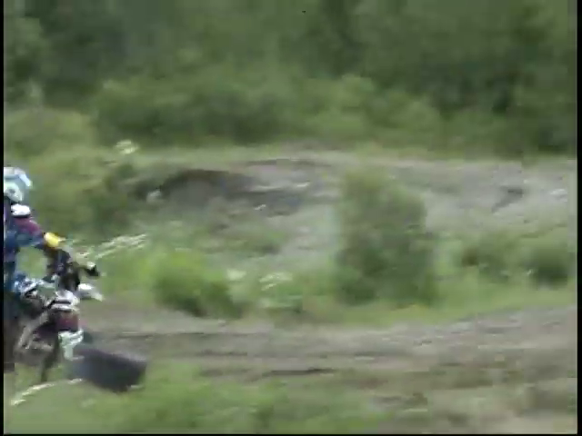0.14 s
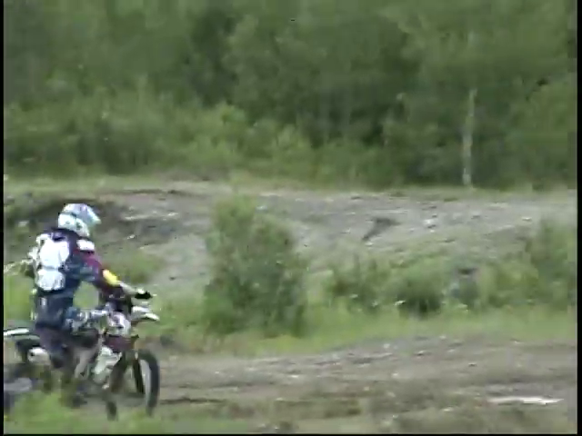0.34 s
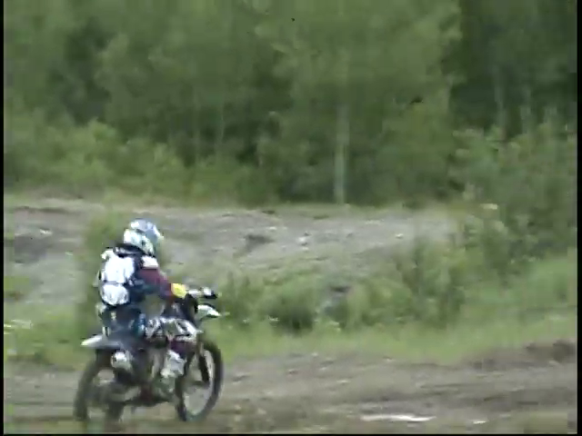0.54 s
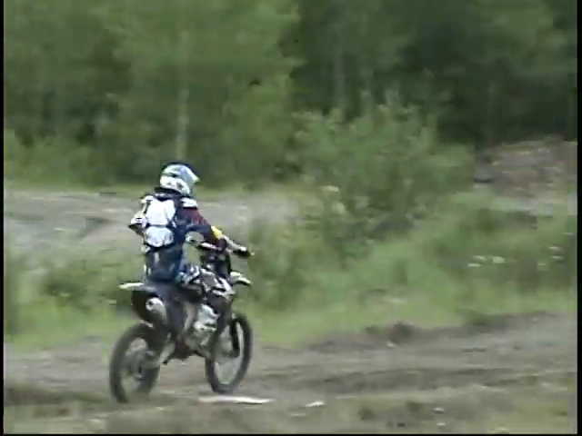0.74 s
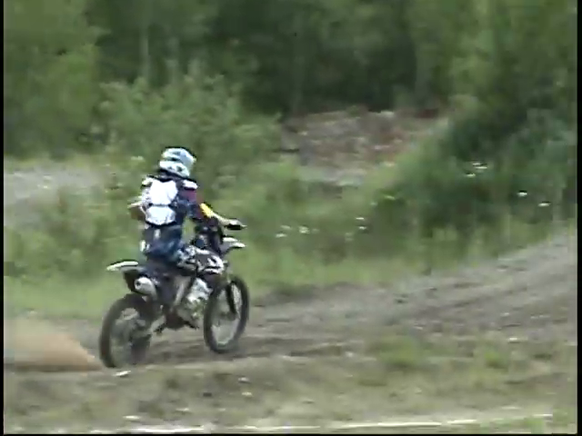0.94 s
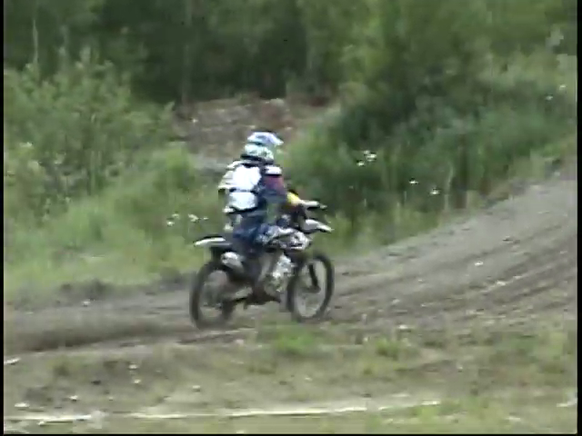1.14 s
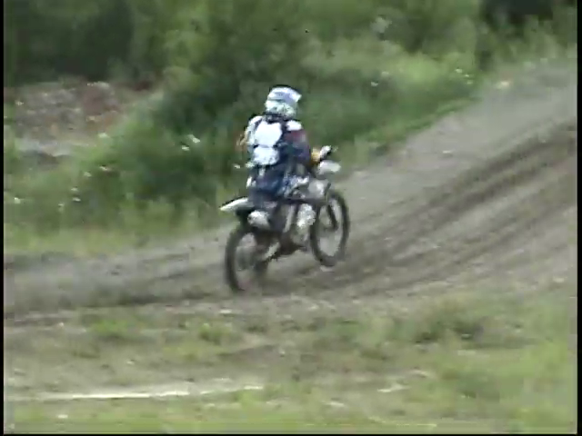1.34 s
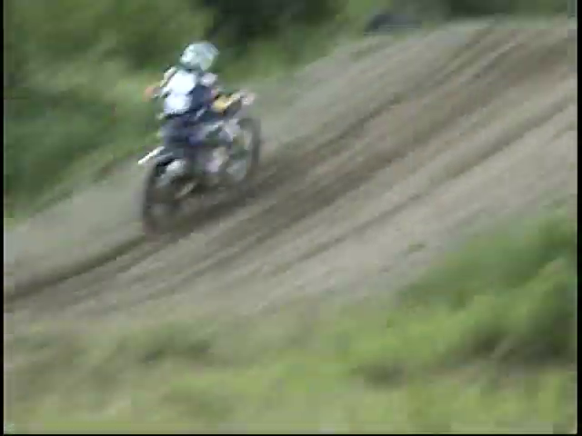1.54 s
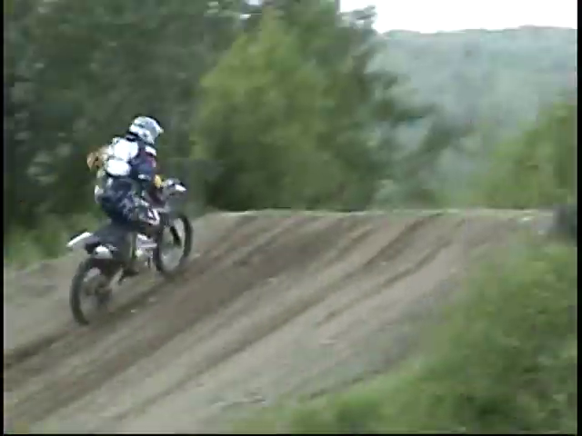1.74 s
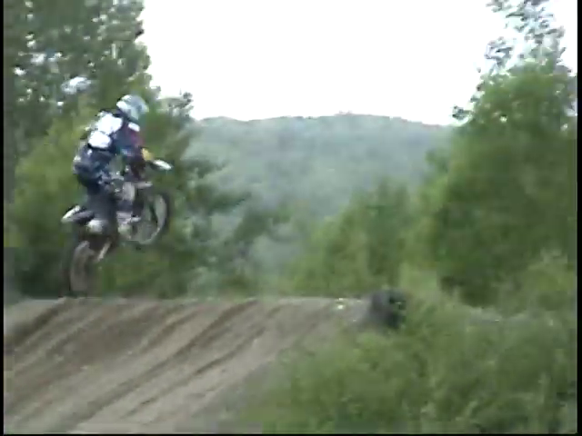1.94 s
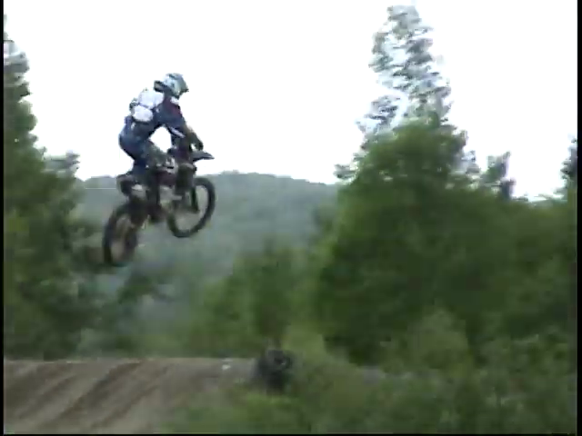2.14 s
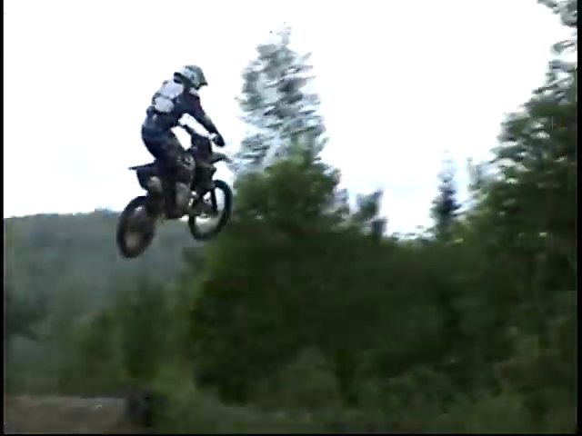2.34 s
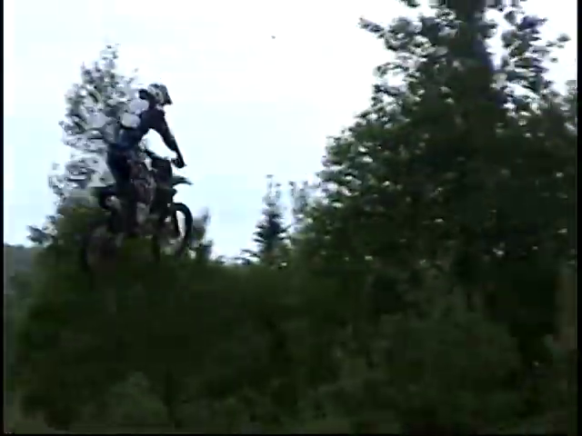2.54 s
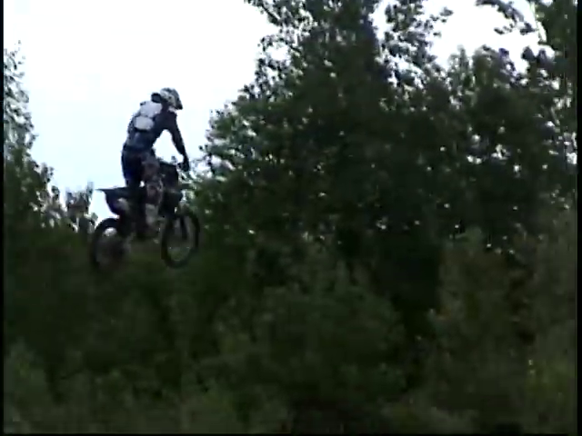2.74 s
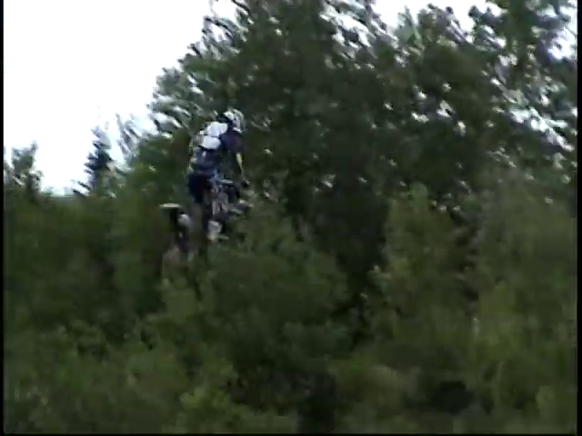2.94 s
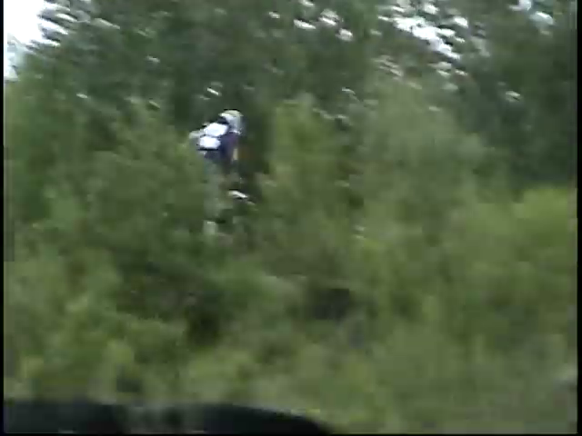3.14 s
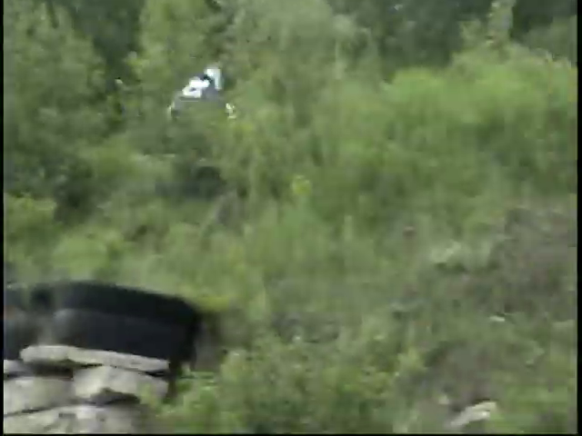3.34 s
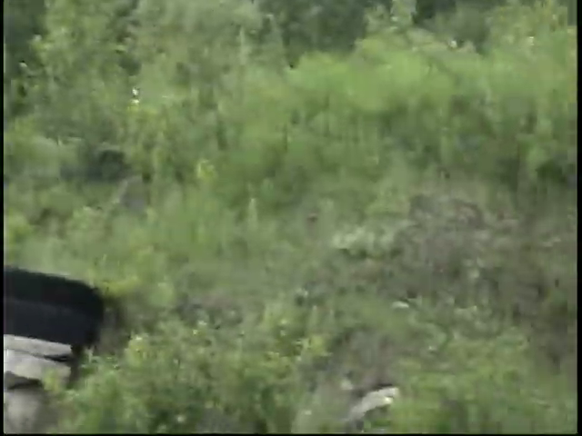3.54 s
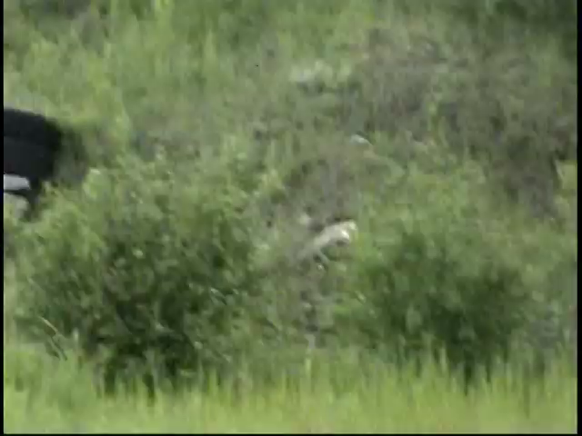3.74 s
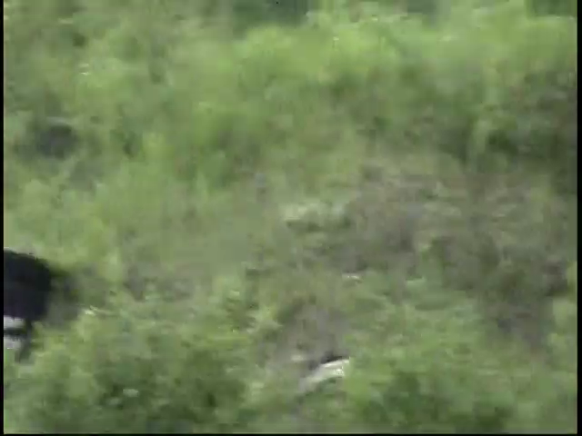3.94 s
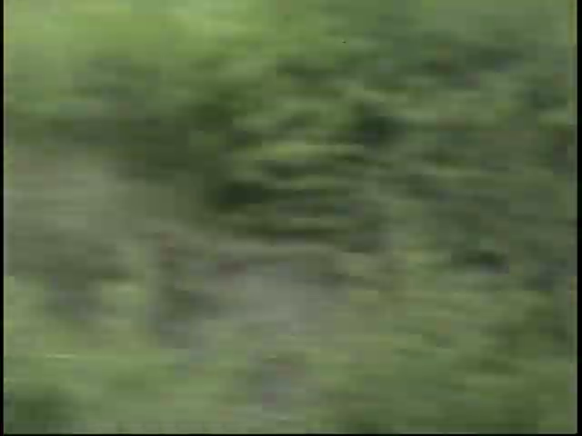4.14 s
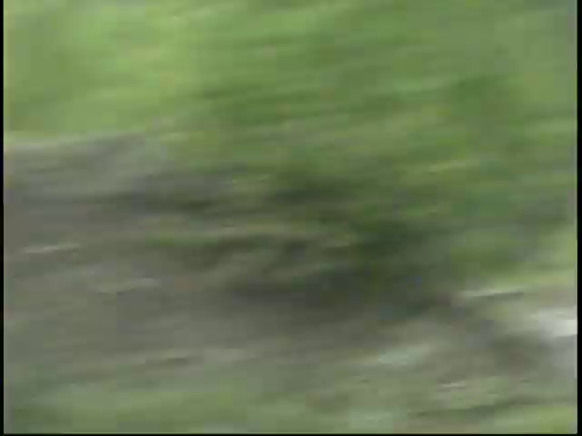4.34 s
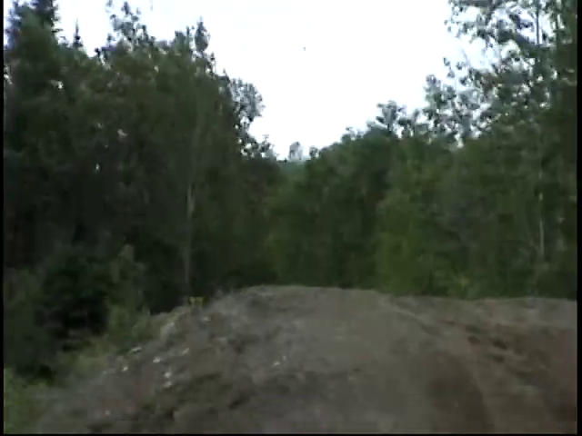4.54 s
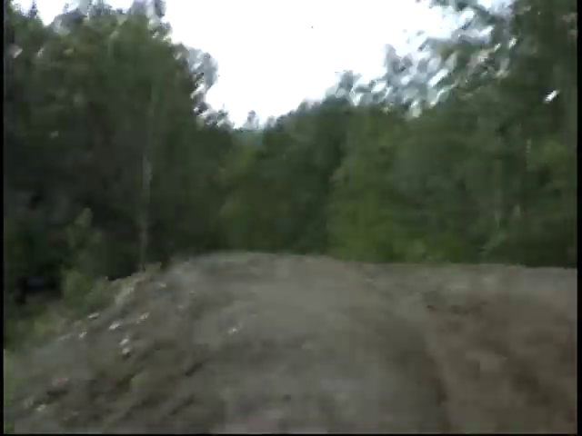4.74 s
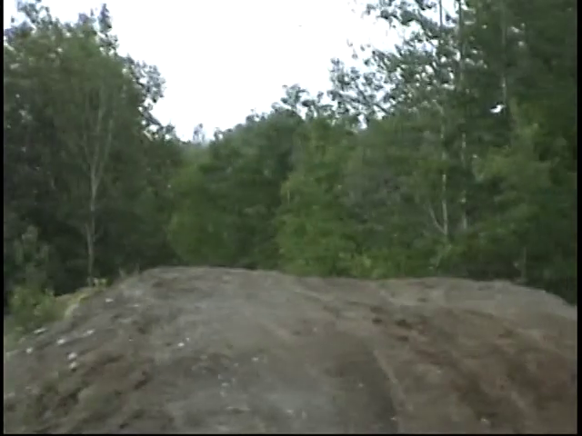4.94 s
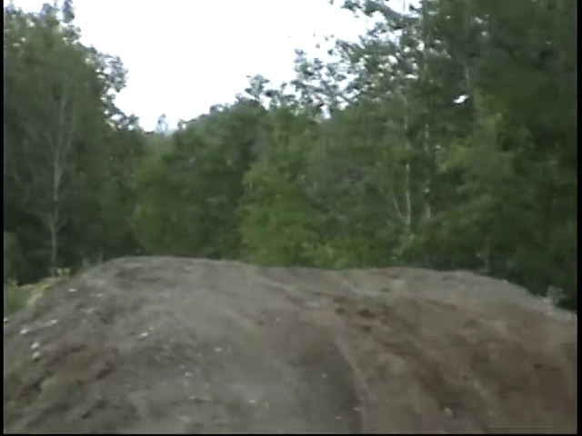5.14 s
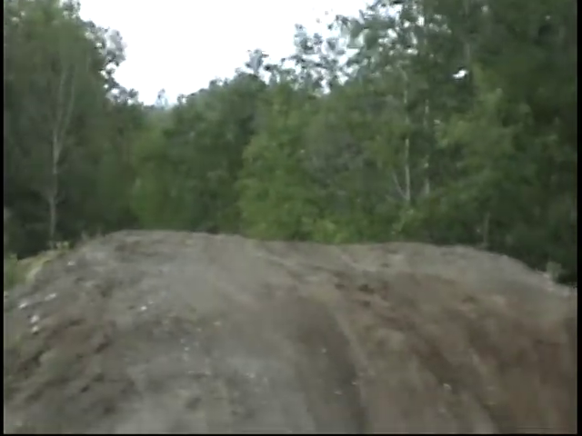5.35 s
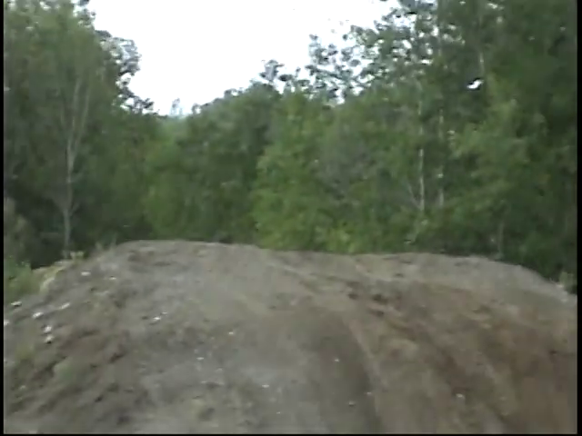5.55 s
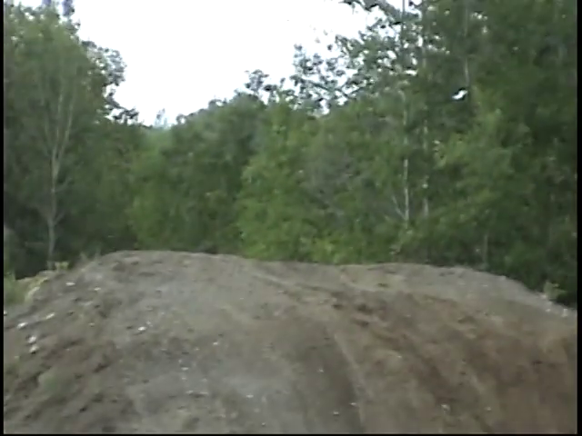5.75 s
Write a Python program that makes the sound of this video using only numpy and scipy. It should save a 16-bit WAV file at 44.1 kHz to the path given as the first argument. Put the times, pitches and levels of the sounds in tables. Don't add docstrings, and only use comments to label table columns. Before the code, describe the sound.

A handheld stereo camera microphone catches a raspy dirt bike some way off: hard, pulsing exhaust with quick flares, then a sudden drop in mid-jump to low soft thumping. One loud rev burst comes at landing, then coasting, with tiny handling clicks and low air thuds. A hard cut leads to a steadier, blurred engine drone from beyond an earth mound, scattered by trees, with wind buffeting and thin electronic hiss.

```python
import sys
import numpy as np
from scipy import signal
from scipy.fft import rfft, irfft, next_fast_len
from scipy.io import wavfile
from scipy.ndimage import uniform_filter1d, map_coordinates

SR = 44100
rng = np.random.default_rng(int(sys.argv[2]) if len(sys.argv) > 2 else 0)


def to_wav(s):
    ch = np.atleast_2d(s).T
    pcm = np.round(np.clip(ch, -1, 1) * 32767)
    wavfile.write(sys.argv[1], SR, pcm.astype(np.int16))


def volts(x):
    e = np.asarray(x, float) / 20
    return 10 ** e


N = 256220
T = np.arange(N) / SR


def unit(x):
    return x / np.sqrt(np.mean(x ** 2) + 1e-20)


def along(points, hz):
    f, v = np.transpose(points)
    return np.interp(np.log(hz + 1), np.log(f + 1), v)


def curves(rows, t):
    s, *cols = np.transpose(rows)
    return [np.interp(t, s, c) for c in cols]


def wobble(rate):
    coarse = T[::32]
    knots = rng.standard_normal(int(N * rate / SR) + 4)
    return np.interp(T, coarse, map_coordinates(knots, [coarse * rate]))


def filtered(x, response):
    m = next_fast_len(N + SR // 10) // 2 * 2
    return irfft(rfft(x, m) * response(np.fft.rfftfreq(m, 1 / SR)), m)[..., :N]


def causal(points, hz):
    cepstrum = irfft(np.log(volts(along(points, hz)) + 1e-6))
    cepstrum[1:len(hz) - 1] *= 2
    cepstrum[len(hz):] = 0
    return np.exp(rfft(cepstrum))


def spikes(times, sizes):
    return np.bincount(np.clip(np.round(times * SR).astype(int), 0, N - 1), sizes, N)


def pair(alike):
    def turn(hz):
        return np.arccos(np.clip(along(alike, hz), -1, 1)) / 2

    noise = rng.standard_normal((2, N))
    mid, side = filtered(noise, lambda hz: np.array([np.cos(turn(hz)), np.sin(turn(hz))]))
    return np.array([mid + side, mid - side])


def patchy(x, depth_db):
    z = signal.stft(x, nperseg=128)[2]
    field = uniform_filter1d(rng.standard_normal(z.shape[-2:]), size=2, axis=0)
    field = uniform_filter1d(field, size=30, axis=1)
    return signal.istft(z * volts(depth_db * unit(field)), nperseg=128)[1][..., :N]


# fade-out start and end, fade-in start and end, all in seconds.
SPLICE = (4.384, 4.399, 4.408, 4.425)


def behind_mound():
    return T > SPLICE[2]


# peak time in seconds, extra
# firings per second, rise in seconds, fall in seconds.
FLARES = [(.1, 3.3, .1, .1), (.52, 22.1, .07, .05), (.63, 15.5, .06, .07), (1.07, 9.1, .07, .13),
          (1.58, 7.3, .08, .07), (2, 2.1, .1, .15), (2.31, 3.5, .09, .1), (3.1, 2.4, .1, .1),
          (3.31, 3.8, .04, .04), (3.47, 38.4, .18, .04), (3.63, 9.4, .08, .3), (4.18, 12.6, .18, .07),
          (5.33, 2, .14, .05), (5.62, 3, .12, .11)]


def speed(rows):
    flares = sum(np.interp(T, (s - rise, s, s + fall), (0, extra, 0)) for s, extra, rise, fall in FLARES)
    return curves(rows, T)[0] + flares


def firings(rows, wait):
    on = (T >= rows[0][0]) & (T <= rows[-1][0])
    turns = np.cumsum(speed(rows) * on) / SR - wait
    times = np.interp(np.arange(int(turns[-1]) + 1), turns[on], T[on])
    return times, np.interp(times, T, speed(rows))


# time in seconds, rate in firings per second.
PASS_RATE = [(0, 76.11), (0.2, 62.26), (0.36, 84.5), (0.57, 75.91), (0.7, 68.28), (0.78, 70.65),
             (1.0, 96.96), (1.33, 77.54), (1.45, 81.95), (1.8, 78.86), (2.15, 81.45), (2.22, 70.2),
             (2.7, 48.3), (3.0, 36.45), (3.28, 43.01), (3.55, 53.87), (4.0, 45.99), (4.4, 57.03)]
CLIMB_RATE = [(4.41, 98.54), (4.5, 80.86), (4.66, 69.44), (5, 71.04), (5.06, 84.12), (5.19, 87.34),
              (5.4, 76.96), (5.73, 97.57), (5.81, 84.8)]
# time in seconds, nearness in dB,
# tailpipe aimed at the camera in dB, screening by dirt and leaves in dB.
PASS = [(0, -26.5, 1.5, 14), (.2, -24, 3, 21.5), (.36, -25, 0.5, 10), (.55, -24, -3.5, 22.5),
        (.72, -24, -2.5, 12), (.87, -22.5, -1, 14), (1.07, -27.5, 4, 20), (1.22, -25.5, -0.5, 11),
        (1.35, -23, -4, 15.5), (1.55, -25.5, -1.5, 10.5), (1.72, -25.5, -4, 12.5), (1.9, -25, -2.5, 29),
        (2.13, -22.5, 2, 24), (2.9, -25.5, -2.5, 30), (3.32, -28, -1, 18.5), (3.47, -28.5, 5, 23),
        (3.9, -27, 0.5, 27), (4.2, -31, -12, 7)]
CLIMB = [(4.42, -32, 3, 21), (4.6, -28, 2.5, 23.4), (4.72, -28, -0.5, 17.8), (4.9, -27, -4, 16.2),
         (5.06, -27.5, -2, 18), (5.2, -29, 1, 21), (5.4, -27.5, -1.5, 21.4), (5.65, -29, 3, 22.5),
         (5.8, -29, 2.5, 21.5)]
# time in seconds, throttle from 0 to 1.
THROTTLE = [(0, 0.91), (1.82, 0.88), (1.93, 0.52), (2.0, 0.83), (2.16, 0.61), (2.215, 0), (3.21, 0.09),
            (3.25, 0.93), (3.31, 1), (3.475, 0.8), (3.5, 0.18), (4.4, 0.08), (4.408, 1)]
# time in seconds, level in dB,
# half width in seconds.
GROUND = [(.45, -9.5, 0.076), (.63, -6, 0.087), (1.01, -17, 0.13), (1.2, -9, 0.085), (1.55, -2, 0.14),
          (1.71, -20, 0.085), (1.85, -27, .06), (1.98, -25, 0.044), (2.15, -16, 0.029), (2.33, 5.5, 0.17),
          (3.15, -14, 0.078), (4.08, -9, 0.13), (1.36, 1, 0.066), (3.33, 9.5, 0.083), (4.36, -16, 0.069)]


def exhaust():
    cruise_rate = 80
    near_db, aim_db, screen_db = curves(PASS + CLIMB, T)
    shut = 1 - np.clip(curves(THROTTLE, T)[0], 0, 1)
    octaves = np.log2(speed(list(PASS_RATE) + list(CLIMB_RATE)) / cruise_rate)
    thump_db = near_db + 6 * octaves - 13 * shut
    bark_db = near_db + aim_db + 8 * octaves - 21.5 * shut
    ground_db = sum(db * np.exp(-((T - s) / wide) ** 2) for s, db, wide in GROUND)
    drone_db = thump_db - 8 + ground_db - bark_db
    open_scatter = 0.076 * volts(-0.89 * aim_db) + 2.1 * shut ** 3.2
    scattered = np.where(behind_mound(), 0.97, open_scatter)
    return thump_db, bark_db, drone_db, -screen_db, scattered


# frequency in Hz, level in dB.
THUMP_OPEN = [(40, -12), (80, -5), (150, 3), (280, 5), (350, 3.5), (420, -6), (520, -12), (700, -43)]
THUMP_SHUT = [(30, -20), (60, -8), (130, 0), (190, 0), (260, -5), (360, -14), (600, -50)]
THUMP_FAR = [(60, -4), (95, 5), (290, 1), (350, -9), (450, -4), (700, -38)]
# multiple of the
# firing rate, open level in dB, shut level in dB, far level in dB.
MULTIPLES = [(1, -6.5, -17, -16), (2, -2, -6, -4), (3, 0, 0, 0), (4, -6, -3, -9), (5, -7, -7, -14),
             (6, -9, -10, -22), (9, -9, -14, -30)]
# frequency in Hz, density in dB per Hz.
MURK = [(40, -46), (100, -17), (200, -2), (330, -0.5), (480, -11.5), (800, -42)]


def thump(times, rate):
    db = exhaust()[0]
    ends = np.r_[times[0] - 1 / rate[0], times, times[-1] + 1 / rate[-1]]
    cycle = 2 * np.pi * (np.interp(T, ends, np.arange(len(ends))) + .015 * wobble(30))
    coarse = T[::32]
    hz = np.interp(T, times, rate)[::32]
    opened = np.clip((db + 36.0) / 5, 0, 1)
    far = behind_mound()
    shares = np.array([opened * ~far, 1 - opened, opened * far])[:, ::32]
    colours = (THUMP_OPEN, THUMP_SHUT, THUMP_FAR)
    lead = np.where(far, -3, 1.3)
    mid, side, power = 0, 0, 0
    for k in range(1, 10):
        gain = 0
        for share, order_db, colour in zip(shares, curves(MULTIPLES, k), colours):
            gain = gain + share * volts(order_db + along(colour, k * hz))
        gain = np.interp(T, coarse, gain)
        power = power + gain ** 2 / 2
        gain = gain * volts(1.3 * wobble(14))
        slip = lead if k == 1 else -.7 * far * (-1) ** k
        mid = mid - gain * np.cos(k * cycle + 0.32 + slip)
        side = side + 0.11 * gain * np.sin(k * cycle + 0.08)
    direct = np.array([mid + side, mid - side]) / np.sqrt(power)
    murk = unit(filtered(pair([(100, 1.0), (400, 1.0)]), lambda f: volts(along(MURK, f))))
    balance = volts(np.outer([.5, -.5], .7 * ~far))
    return volts(db) * (direct + volts(-16) * murk) * balance


# time in seconds, upper ring relative to lower ring in dB.
HEADING = [(0, -2.5), (.4, -2), (.9, -5), (1.7, 0.5), (1.9, -3), (2.01, 1), (2.16, -1.5), (2.3, -3),
           (3.1, -5.5), (3.35, 5.5), (3.5, -0.5), (4.39, -14), (4.42, 0), (5, 0), (5.4, -3.5), (5.8, -4.5)]


def shocks(times, rate):
    jitter, strength, late, fading = rng.standard_normal((4, len(times)))
    front = times - .0017 + .00006 * jitter
    size = volts(1.2 * strength) * np.sqrt(SR / rate)
    beat = spikes(front, size)
    returned = np.minimum(.5 * volts(curves(HEADING, times)[0]), .7)
    bounce = spikes(front + .0014 + .00006 * late, returned * size * volts(2.5 * fading))
    return beat, uniform_filter1d(bounce, size=5)


def swelling(beat, t60, rise):
    t = np.arange(SR // 50) / SR
    shape = volts(-60 * t / t60) * (1 - np.exp(-t / rise))
    return signal.fftconvolve(beat, shape / np.linalg.norm(shape))[:N]


def turbulence(beat):
    gas = swelling(beat, t60=.012, rise=.0011) * pair([(3000, 0.89), (12000, 0.19)])
    return filtered(gas, lambda hz: 1 / (1 + (1900 / (hz + 1)) ** 4))


# frequency in Hz, left-right likeness from 0 to 1.
ALIKE = [(200, 1), (1400, 1), (3100, 1), (6800, 0.9), (15000, 0.83)]


def scatter(beat):
    roar = unit((.7 + .55 * swelling(beat, t60=.045, rise=.0004)) * pair(ALIKE))
    return filtered(roar, lambda hz: 1 / (1 + (hz / 11600) ** 4))


# frequency in Hz, density in dB per Hz.
SILENCER = [(150, -71.5), (520, -11.5), (680, -3), (1020, -6.5), (1200, -1), (1540, -5), (1760, -9),
            (2180, -4.5), (2900, -9.5), (4500, -12), (5400, -18), (9500, -21.5), (13500, -36.5),
            (16300, -96)]
# frequency in Hz, left over right in dB.
LEFT_OVER_RIGHT = [(200, .3), (700, 1), (1290, 2), (2380, 3.3), (4400, 2.5), (8120, -1), (15000, 1.5)]


def bark(times, rate):
    db, drone_db, sizzle_db, scattered = exhaust()[1:]
    scattered = np.clip(scattered, 0, np.where(behind_mound(), .8, .9))
    beat, bounce = shocks(times, rate)
    direct = .85 * (beat + bounce) + .48 * turbulence(beat)
    roar = scatter(beat)

    def blend(share):
        return volts(db) * (np.sqrt(1 - share) * direct + np.sqrt(share) * roar)

    def low(hz):
        return 1 / (1 + (hz / 950) ** 6)

    def high(hz):
        return 1 / (1 + (4800 / (hz + 1)) ** 6)

    def ring(hz):
        return 1 / (1 + (hz / 1760) ** 12)

    def ears(hz):
        return volts(np.outer([.5, -.5], along(LEFT_OVER_RIGHT, hz)))

    source = blend(scattered)
    low_source = blend(.45 * scattered)
    drone = filtered(volts(drone_db + 2) * low_source, low)
    sizzle = filtered(volts(sizzle_db + 13.5) * source, high)
    lower_ring = filtered(source, lambda hz: ring(hz) - low(hz))
    upper_ring = filtered(volts(curves(HEADING, T)[0]) * source, lambda hz: 1 - ring(hz) - high(hz))
    beamed = patchy(drone + sizzle + lower_ring + upper_ring, depth_db=1.5)
    return volts(14) * filtered(beamed, lambda hz: causal(SILENCER, hz) * ears(hz))


FIRST_TURN = (.793, .275)


def bike():
    rides = [firings(PASS_RATE, FIRST_TURN[0]), firings(CLIMB_RATE, FIRST_TURN[1])]
    times, rate = np.concatenate(rides, axis=1)
    return thump(times, rate) + bark(times, rate)


# time in seconds, buffet level in dB.
WIND = [(0, -61), (.4, -67), (1.4, -72), (2.9, -71), (3.3, -65), (3.9, -71), (4.2, -59), (4.4, -49.5),
        (5.1, -46), (5.8, -50)]
# frequency in Hz, density in dB per Hz.
RUMBLE = [(15, -10), (35, 0), (75, -1), (130, -7), (250, -22), (600, -60)]
# time in seconds, level in dB, frequency in Hz.
BUFFETS = [
    (4.2, -35, 70),
    (4.286, -37, 80),
    (4.319, -28, 70),
    (4.37, -31, 60),
]


def wind():
    lumps = volts(4 * np.array([wobble(9), wobble(9)]))
    rumble = filtered(pair([(30, 0.9), (200, 1.0)]), lambda hz: volts(along(RUMBLE, hz)))
    rumble = unit(lumps * rumble)
    slaps = 0
    for s, db, hz in BUFFETS:
        slaps = slaps + volts(db) * np.exp(-((T - s) / 0.013) ** 2) * np.sin(2 * np.pi * hz * (T - s))
    return volts(curves(WIND, T)[0] + 5) * rumble + slaps * np.array([[1], [-.6]])


# frequency in Hz, density in dB per Hz.
HISS = [(500, 21.5), (2000, 10), (3400, 6.5), (7400, -3.5), (10600, -7), (13000, -25), (14000, -16),
        (15500, -23), (16200, -30), (16600, -90)]
# frequency in Hz, level in dB.
WHINE = [(15735, -84), (9400, -81), (13900, -94)]


def electronics():
    hiss = unit(filtered(pair([(3000, 0.66), (12000, 0.24)]), lambda hz: volts(along(HISS, hz))))
    whine = sum(volts(db - 5 + 4 * wobble(12)) * np.sin(2 * np.pi * hz * T) for hz, db in WHINE)
    return volts(-54.5) * hiss + whine


# time in seconds, peak in dB, dull body part in dB.
TICKS = [
    (3.659, -49, -9),
    (3.694, -50, 14),
    (3.7277, -48, -5),
]
# time in seconds, level in dB, frequency in Hz, t60 in seconds.
KNOCK = (3.717, -28, 600, .022)


def handling():
    def decay(s, t60):
        return (T >= s) * volts(-60 * np.abs(T - s) / t60)

    def band(centre, width):
        return unit(filtered(rng.standard_normal(N), lambda hz: np.exp(-((hz - centre) / width) ** 2)))

    crisp, dull = band(8800, 2200), band(2800, 1500)
    ticks = sum(volts(db) * decay(s, 0.0076) * (crisp + volts(body_db) * dull) for s, db, body_db in TICKS)
    s, db, hz, t60 = KNOCK
    return ticks + volts(db) * decay(s, t60) * np.sin(2 * np.pi * hz * (T - s))


def scene():
    return bike() + wind() + electronics() + handling()


def roll_off(x):
    return signal.sosfilt(signal.butter(12, 16410, fs=SR, output="sos"), x)


def record(dry):
    mix = dry * np.interp(T, SPLICE, (1, 0, 0, 1))
    return roll_off(mix)


dry = scene()
out = record(dry)
to_wav(out)
```